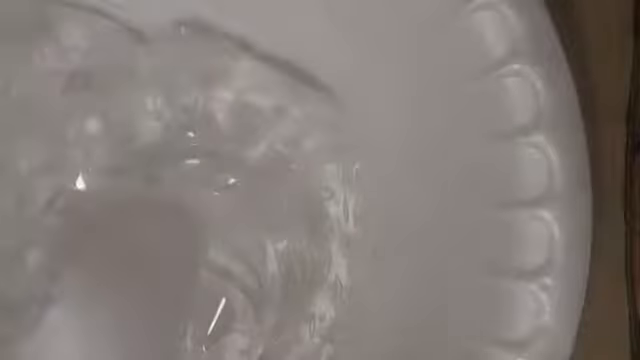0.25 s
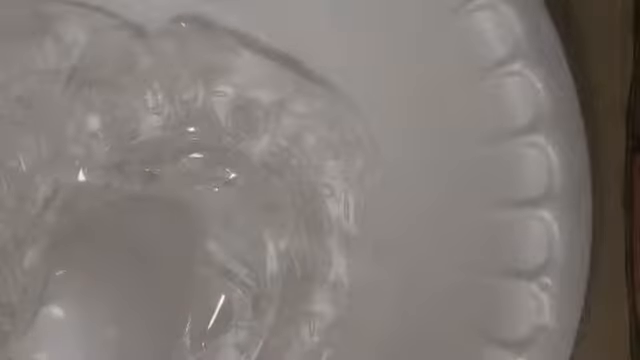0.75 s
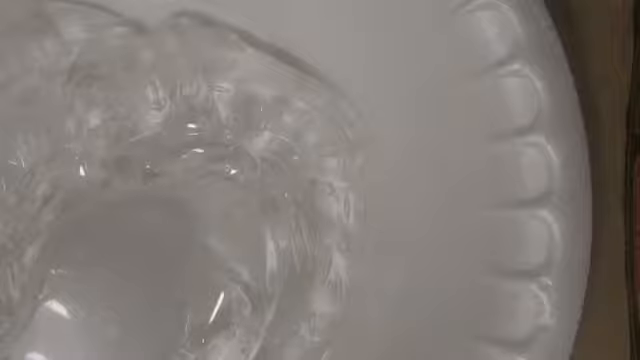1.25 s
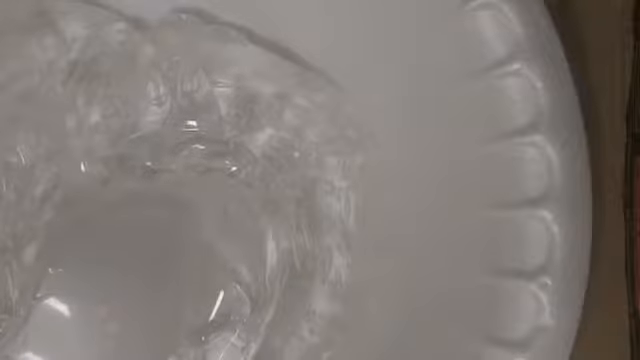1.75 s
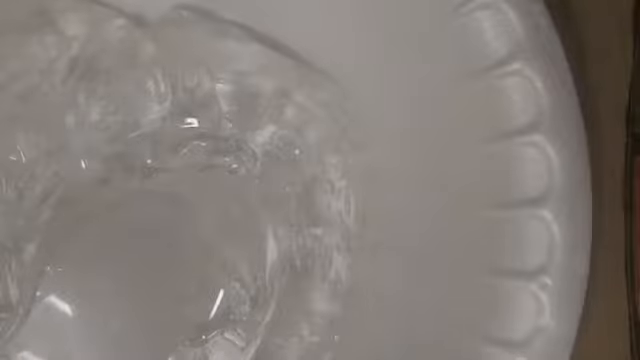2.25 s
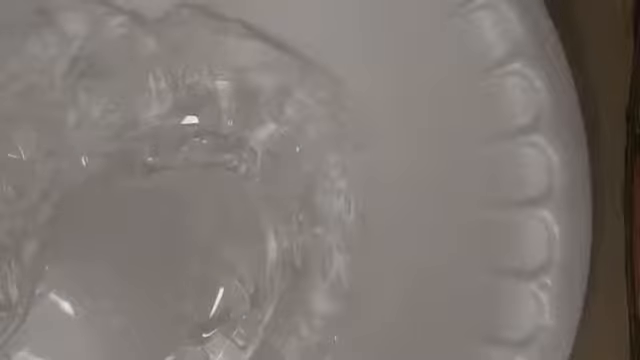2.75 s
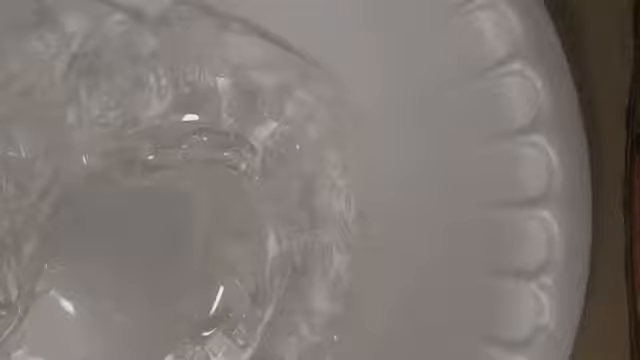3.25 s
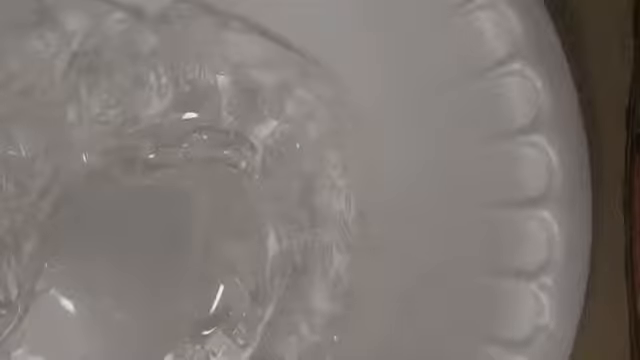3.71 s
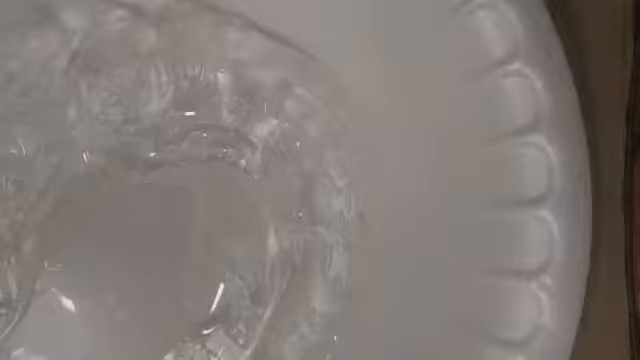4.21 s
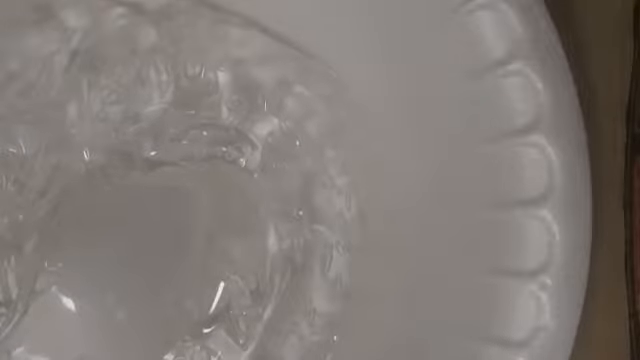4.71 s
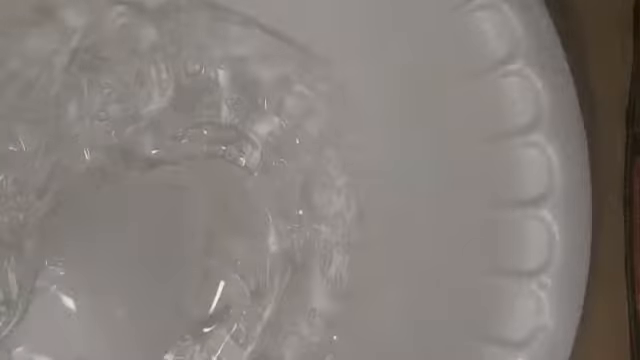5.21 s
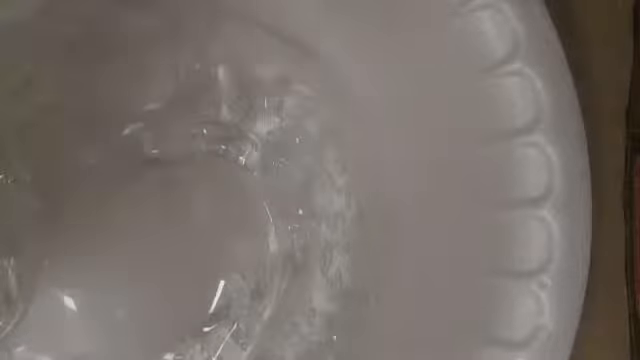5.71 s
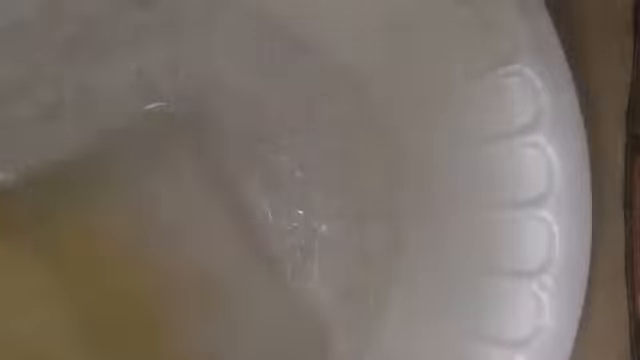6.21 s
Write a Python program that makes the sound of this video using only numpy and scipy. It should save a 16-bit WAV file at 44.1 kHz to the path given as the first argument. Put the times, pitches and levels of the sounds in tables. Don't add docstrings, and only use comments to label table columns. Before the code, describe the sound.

Close sticky crackles, soft bright rustles and light plastic taps as gloss is stirred and folded in a bowl, while an appliance drones steadily behind.

```python
import sys
import numpy as np
from scipy import signal
from scipy.fft import rfft, irfft
from scipy.io import wavfile
from scipy.ndimage import uniform_filter1d

SR = 44100
rng = np.random.default_rng(int(sys.argv[2]) if len(sys.argv) > 2 else 0)


def file_out(sig):
    cols = np.atleast_2d(sig).T
    lim = np.clip(cols, -1, 1)
    pcm = np.round(lim * 32767).astype(np.int16)
    wavfile.write(sys.argv[1], SR, pcm)


def decibels_to_gain(level_db):
    exponent = np.asarray(level_db, float) / 20
    return 10 ** exponent


N = 284886

# (frequency [Hz], density [dB per Hz])
FILM_SPECTRUM = [(2000, -12), (3200, -3), (4500, -4), (7000, 0), (10000, -1), (12500, 1), (14500, 1.5)]
# (frequency [Hz], width [Hz], level [dB])
WALL_RESONANCES = [(1536, 610, 19.5), (1940, 680, -10), (3040, 210, 2), (4620, 1500, 1)]
# (time [s], steady drag [dB], share of strokes in the wall [dB])
HAND_PRESSURE = [(0, -62.5, -6), (.4, -71.5, 3.5), (.6, -56.5, -1), (1.0, -69, -19), (1.22, -76, 1),
                 (1.35, -70, -6.5), (2.0, -69, -8), (2.15, -75, -1.5), (2.45, -68.5, -0.5),
                 (2.68, -76, -13), (3.02, -74.5, 12), (3.12, -77, 7.5), (3.6, -73.5, 1.5),
                 (3.95, -74.5, 15), (4.22, -74.5, 4), (4.7, -73, -4.5), (5.3, -75.5, -6), (6.46, -74.5, 6)]
# (peak time [s], rise [s], fall [s], rustle [dB], brightness [dB])
LONG_STROKES = [(.247, 0.17, 0.16, -55.5, 9), (.46, 0.039, 0.53, -58.5, 8.5), (.64, 0.17, 0.047, -64, -1),
                (0.707, 0.047, 0.072, -50.5, 5.5), (.873, 0.11, 0.052, -50, 2.5),
                (1.139, 0.31, 0.053, -61, 0), (1.255, 0.015, 0.27, -64.5, 4),
                (1.55, 0.31, 0.094, -61.5, 12), (1.638, 0.058, 0.075, -60, 12),
                (2.027, 0.28, 0.11, -61.5, 8.5), (2.333, 0.12, 0.027, -59.5, 3),
                (3.468, 0.16, 0.067, -63.5, 3), (4.464, 0.031, 0.11, -61, 2), (4.54, 0.094, 0.086, -63, 17),
                (4.6, 0.093, 0.043, -57.5, -2), (4.941, 0.013, 0.19, -67, 3),
                (5.372, 0.031, 0.39, -66.5, 7), (5.54, 0.28, 0.069, -69, -12), (6.2, 0.2, 0.27, -82, 4),
                (4.8, 0.11, 0.088, -76, 11)]
# (peak time [s], rise and fall [s], rustle [dB], brightness [dB])
EVEN_TUGS = [(1.194, 0.014, -58.5, -8), (1.419, 0.019, -46.5, 5.5), (1.715, 0.031, -54.5, 12.5),
             (1.87, 0.17, -66, 14), (2.263, 0.12, -56, 5), (2.83, 0.18, -66.5, 2), (3.046, 0.023, -59, 8),
             (3.169, 0.19, -68.5, 9), (3.354, 0.077, -64, 6), (3.571, 0.027, -58.5, 3),
             (3.983, 0.054, -81.5, 5), (4.24, 0.16, -68, 7), (4.37, 0.1, -61.5, -1),
             (5.144, 0.013, -59, -6)]
# (start [s], end [s], frequency [Hz], width [Hz])
AIR_POCKETS = [
    (.445, .515, 10650, 1600),
    (.415, .47, 11400, 350),
    (.47, .525, 7800, 600),
    (.567, .655, 4050, 350),
    (4.515, 4.565, 11100, 500),
]
# (time [s], peak [dB], centre [Hz])
FILM_SNAPS = [(0.0493, -45, 13000), (0.1206, -39, 12200), (0.1408, -34, 11700), (0.1954, -45, 13100),
              (0.4381, -45, 13400), (0.4586, -44, 12900), (0.4684, -39, 12600), (0.4805, -44, 12700),
              (0.5219, -42, 9300), (0.6387, -44, 8650), (0.6473, -42, 11400), (0.6756, -39, 6160),
              (0.6864, -30, 7000), (0.7704, -52, 10600), (0.7937, -52, 8400), (0.858, -33, 5200),
              (0.8717, -33.5, 8400), (0.9332, -43.5, 8400), (1.0959, -51, 5400), (1.1878, -42, 5960),
              (1.1973, -44, 5600), (1.2488, -47, 5500), (1.2575, -43, 5900), (1.2958, -47, 12500),
              (1.3482, -37, 10400), (1.4112, -37, 12600), (1.419, -38, 11900), (1.4229, -46, 13100),
              (1.4259, -35, 12300), (1.4598, -46, 12700), (1.4665, -47, 12700), (1.4859, -45, 12700),
              (1.5708, -43, 13100), (1.61, -57, 11400), (1.6512, -44, 11200), (1.6624, -43, 12400),
              (1.6749, -43, 12600), (1.7076, -37, 12500), (1.7186, -36, 12200), (1.7234, -46, 12300),
              (1.7707, -41, 13300), (1.7785, -42, 10200), (1.7868, -50, 12800), (1.8088, -53, 12900),
              (1.8117, -49, 13000), (1.8454, -56, 12300), (1.8685, -51, 7900), (1.8759, -44, 12600),
              (1.9396, -43, 13100), (1.959, -55, 13000), (1.9784, -54, 11600), (2.0294, -36.5, 11500),
              (2.0361, -42, 11300), (2.168, -50, 13200), (2.1823, -37, 7800), (2.1896, -54, 5600),
              (2.2159, -33, 8900), (2.2487, -34, 9330),
              (2.265, -38, 9000), (2.274, -36, 11000), (2.2828, -32.5, 10600), (2.323, -40, 10500),
                 (2.3289, -42, 6700), (2.332, -39, 8800), (2.3443, -45, 13000), (2.3951, -52, 8600),
                 (2.4007, -45, 6400), (2.4348, -50, 9300), (2.5, -40.5, 8850), (2.509, -40, 7100),
                 (2.6084, -53, 8100), (2.77, -46, 6700), (2.79, -40, 5300), (2.8176, -38.5, 8700),
                 (2.8479, -47, 9200), (2.892, -52, 3500), (2.8956, -52, 3510), (2.9152, -40, 7360),
                 (2.981, -46, 10900), (3.0351, -28.5, 6800), (3.0389, -34, 10800), (3.0483, -40, 7600),
                 (3.0795, -33, 9500), (3.094, -38, 11300), (3.0986, -49, 12200), (3.1184, -44, 9000),
                 (3.127, -41, 12400), (3.1563, -40, 8600), (3.1595, -39, 10400), (3.1664, -34, 10700),
                 (3.1794, -31.5, 9400), (3.2069, -40, 12600), (3.2298, -47, 10400), (3.2434, -38.5, 12800),
                 (3.2649, -52, 8500), (3.3065, -54, 12900), (3.311, -41, 11500), (3.319, -45, 10000),
                 (3.3335, -33.5, 8600), (3.3489, -41, 9400), (3.356, -33, 11700), (3.3615, -40, 11200),
                 (3.3658, -43, 8600), (3.379, -50, 12400), (3.46, -35, 8300), (3.4745, -50, 7400),
                 (3.4915, -50, 8200), (3.52, -47, 13000), (3.5245, -52, 9100), (3.5525, -52, 10500),
                 (3.559, -40, 8400), (3.5637, -40, 11800), (3.569, -40, 12100), (3.5778, -41, 11200),
                 (3.6, -42.5, 8700), (3.66, -44.5, 8600),
              (3.9768, -43, 8200), (3.9875, -45, 8500), (4.0298, -59, 4200), (4.1045, -49, 8700),
                 (4.125, -54, 3500), (4.15, -53, 3700), (4.1694, -51, 8400), (4.176, -48, 3800),
                 (4.1807, -41, 8700), (4.185, -40, 8300), (4.1985, -45, 9600), (4.2014, -46, 9600),
                 (4.2318, -39, 8700), (4.2409, -30.5, 12900), (4.2449, -46, 10200), (4.2491, -43, 7300),
                 (4.2721, -42, 9400), (4.2774, -39, 8500), (4.2977, -36, 12500), (4.3059, -41, 3800),
                 (4.3233, -41, 13000), (4.3298, -42, 8700), (4.3407, -36, 10400), (4.3494, -36.5, 9300),
                 (4.3655, -38, 6500), (4.3704, -41, 4600), (4.3742, -46, 5000), (4.3777, -41, 5800),
                 (4.3966, -40, 12700), (4.4296, -43, 7800), (4.4388, -48, 10400), (4.4432, -35, 9000),
                 (4.4566, -42, 12500), (4.4693, -40, 8700), (4.4878, -40, 6900), (4.5107, -40, 6900),
                 (4.5197, -40, 13000), (4.5455, -48, 12800), (4.5732, -39, 8600), (4.5894, -40, 7100),
                 (4.5932, -44, 3900), (4.6054, -44, 12000), (4.6424, -44, 7800), (4.6454, -47, 5600),
                 (4.6554, -41, 4000), (4.9317, -44, 7400), (4.935, -43.5, 12100), (5.052, -49, 7300),
                 (5.1385, -27, 11400), (5.143, -50, 12500), (5.147, -53, 10200), (5.1503, -44, 12900),
                 (5.1717, -43, 7700), (5.1987, -40.5, 4000), (5.3553, -48, 7900), (6.1114, -56, 4300),
                 (6.3476, -56, 5200), (6.418, -49, 13200)]
# (peak time [s], peak [dB], pitch [Hz], rise [s])
WET_POPS = [(.1445, -43, 1340, .003), (.1445, -43, 680, 0.0021), (.157, -46.5, 724, .003),
            (.4386, -44, 1490, 0.00086), (0.8568, -47, 4940, 0.00087), (0.8715, -52, 2370, 0.0011),
            (.555, -51, 1720, .003), (.5609, -51, 970, .003), (.571, -48, 895, 0.0034),
            (1.0962, -43, 1900, 0.0012), (1.0963, -45.5, 2580, .001), (1.126, -43, 2300, 0.00046),
            (1.1319, -45, 2610, .0018), (1.1377, -45, 2250, 0.00084), (1.1432, -40, 2300, 0.00065),
            (1.1486, -42, 2260, 0.00077), (1.152, -42, 1900, .0008), (1.161, -51, 2200, .003),
            (1.1876, -26.5, 2030, 0.00088), (1.1942, -36, 2210, 0.00084), (1.2005, -37, 1910, .0025),
            (1.205, -44, 1850, 0.00148), (1.2116, -53, 1930, .002), (1.1938, -44, 1340, 0.00137),
            (1.414, -47.5, 1080, 0.0016), (1.4185, -34.5, 1660, 0.00082), (1.4265, -53, 1510, .0012),
            (2.2483, -46.5, 2420, 0.00077), (2.3242, -56, 2030, 0.00064), (3.0345, -28, 735, .0015),
            (3.038, -32, 1020, 0.00214), (3.043, -37, 970, 0.0017), (3.044, -33, 520, .003),
            (3.0482, -30, 850, 0.0011), (3.0505, -31, 620, 0.00079), (3.035, -43, 2520, .001),
            (3.0566, -41, 860, 0.0014), (3.0692, -42, 825, 0.0016), (3.0779, -45, 830, 0.0019),
            (3.0868, -49, 1550, 0.0016), (3.9853, -53, 1610, .001), (4.2416, -56, 1900, .0008),
            (4.2779, -46.5, 1750, .0008), (4.298, -47, 3000, 0.00051), (4.4301, -53, 1700, 0.00081),
            (4.5154, -48, 1050, 0.0014), (4.595, -46, 1040, 0.0018)]
# (peak time [s], peak [dB], pitch [Hz], rise [s])
TABLE_THUMPS = [
    (0.1452, -37.5, 300, 0.0026),
    (0.154, -32.5, 284, 0.0037),
    (1.419, -40.5, 333, 0.0032),
    (1.425, -37.5, 282, 0.0032),
    (3.039, -39.5, 385, 0.0038),
]
# (time [s], peak [dB], pitch [Hz], share of the other modes [dB], crack [dB])
BOWL_KNOCKS = [(.1425, -36.5, 670, 12, 0.5), (.55, -38, 883, -8, -10), (1.0955, -39, 670, -8, -6),
               (1.4175, -35.5, 1550, 23, 0), (2.181, -43, 654, -7, -5), (2.2145, -42, 1330, 3, 1),
               (3.0335, -32.5, 1420, -4, -4), (3.156, -47.5, 1760, -23, -8), (4.365, -42.5, 1630, -21, -17),
               (4.514, -37, 920, -9, -10), (4.5885, -35, 650, -2, -0.5), (4.592, -51, 1030, -2, -14),
               (5.138, -56, 1940, -28, 14), (5.171, -54, 1930, -22, 7), (5.199, -60, 2210, 2, -4)]
# (frequency [Hz], level [dB], t60 [s])
BOWL_MODES = [(520, -26, 0.098), (520, -2.5, 0.23), (641, 7, 0.045), (741, -1, 0.11), (860, -5.5, 0.11),
              (1012, 10, 0.023), (1160, -16, 0.025), (1340, 14, 0.015), (1580, -12, 0.1), (1770, 0.5, 0.02),
              (2200, -66, .04), (2580, -31, 0.027)]
# (start [s], length [s], first pitch [Hz], width [Hz], level [dB])
GRITTY_SLIPS = [(.438, 0.071, 1600, 130, -54), (.452, 0.047, 1250, 130, -55.5),
                (0.44, 0.049, 1600, 260, -62), (.436, 0.047, 3150, 690, -57.5),
                (.83, 0.071, 5830, 340, -60), (.452, 0.065, 7000, 520, -64), (.452, 0.04, 4950, 250, -59),
                (0.55, .05, 4900, 260, -65), (.445, .05, 2700, 230, -62), (0.442, 0.067, 12800, 640, -50),
                (1.1, 0.073, 2300, 900, -60), (0.21, 0.15, 1500, 340, -66), (.687, 0.065, 3960, 280, -57)]
# (frequency [Hz], density [dB per Hz])
ROOM_AIR = [(76, -74), (130, -38.5), (208, -16.5), (290, -9.5), (346, -9.5), (413, -2.5), (483, -8.5),
            (532, -12.5), (939, -23), (1830, -39), (2500, -36), (3040, -33), (6150, -50.5), (14000, -46)]
# (frequency [Hz], width [Hz], level [dB])
DUCT_DRONES = [(400.4, 46, -58), (430.1, 46, -59.5), (1029.5, 23, -77), (640.5, 70, -72.5)]
# (frequency [Hz], wander [Hz], level [dB])
MOTOR_LINES = [(360, 0.21, -57), (770, 3, -82), (873, 10, -83), (1168, 2, -77), (1260, 2, -82),
               (2270, 8.9, -93), (3105, 4, -83), (3622, 2.5, -83), (4140, 2.5, -87)]


def evened(x):
    return x / np.sqrt(np.mean(x ** 2) + 1e-20)


def add(mix, s, sound):
    part = mix[round(s * SR):][:len(sound)]
    part += sound[:len(part)]


def coloured(x, points):
    f, db = np.transpose(points)
    hz = np.fft.rfftfreq(len(x), 1 / SR)
    gain = decibels_to_gain(np.interp(np.log(hz + 1), np.log(f + 1), db))
    return evened(irfft(rfft(x) * gain, len(x)))


def resonate(x, hz, width):
    r = np.exp(-np.pi * width / SR)
    return signal.lfilter([1 - r, 0, r - 1], [1, -2 * r * np.cos(2 * np.pi * hz / SR), r * r], x)


def ring(hz, t60, t):
    return decibels_to_gain(-60 * t / t60) * np.sin(2 * np.pi * hz * t)


def rubbing():
    tears_per_s, spread_db, clump_db = 3000, 2.4, 1.5
    t = np.arange(N) / SR
    slow_t = t[::32]
    level, bright_level, wall_level = [np.interp(t, slow_t, gain) for gain in rub_levels(slow_t)]
    tears = decibels_to_gain(spread_db * np.minimum(rng.exponential(1, N), 5)) * (rng.random(N) < tears_per_s / SR)
    tears = evened(tears * rng.choice([-1., 1.], N))
    tears = tears + rng.standard_normal(N)
    clumps = evened(uniform_filter1d(rng.standard_normal(N), 220))
    tears = evened(tears * decibels_to_gain(clump_db * clumps))
    wall = evened(sum(decibels_to_gain(db) * resonate(tears, hz, width) for hz, width, db in WALL_RESONANCES))
    film = coloured(tears, FILM_SPECTRUM)
    dull = signal.sosfiltfilt(signal.butter(3, 9500, fs=SR, output="sos"), film)
    return level * evened(dull) + bright_level * evened(film - dull) + wall_level * wall


def rub_levels(t):
    bright_drag_db, wall_rest_db, rest_db = 4, -68.5, -75
    span_db = 17.5
    s, drag_db, wall_db = np.transpose(HAND_PRESSURE)
    drag = np.maximum(decibels_to_gain(np.interp(t, s, drag_db)) ** 2 - decibels_to_gain(rest_db) ** 2, 0)
    dull, bright = np.zeros(len(t)), np.zeros(len(t))
    tugs = [(peak, length, length, db, bright_db) for peak, length, db, bright_db in EVEN_TUGS]
    for peak, rise, fall, db, bright_db in LONG_STROKES + tugs:
        away = np.maximum((peak - t) / rise, (t - peak) / fall)
        power = decibels_to_gain(db - span_db * away) ** 2
        dull += power
        bright += power * decibels_to_gain(bright_db) ** 2
    wall = decibels_to_gain(wall_rest_db) ** 2 + dull * decibels_to_gain(np.interp(t, s, wall_db)) ** 2
    return np.sqrt([drag + dull, drag * decibels_to_gain(bright_drag_db) ** 2 + bright, wall])


def swallowed(x):
    t = np.arange(N) / SR
    for start, end, hz, width in AIR_POCKETS:
        depth = np.clip(np.minimum(t - start, end - t) / 0.0085, 0, 1)
        for stage in range(3):
            x = x - depth * resonate(x, hz, width)
    return x


def snaps():
    out, t = np.zeros(N), np.arange(2000) / SR
    envelope = (decibels_to_gain(-60 * t / 0.006) + decibels_to_gain(-19 - 60 * t / 0.03)) * (1 - np.exp(-t / 0.0003))
    for s, db, hz in FILM_SNAPS:
        wall_db = -19.5 - 3.5 * np.log2(hz / 8000)
        fizz = rng.standard_normal(len(t)) * envelope
        tick = resonate(fizz, hz, 0.37 * hz) + 0.4 * signal.lfilter([1, -1], [1, -.55], fizz)
        wall = resonate(resonate(fizz, 2100, 4800), 2100, 4800)
        snap = tick / abs(tick).max() + decibels_to_gain(wall_db) * wall / abs(wall).max()
        add(out, s - .0006, decibels_to_gain(db - 1) * snap)
    return out


def pops_and_thumps():
    out = np.zeros(N)
    for s, db, hz, rise in WET_POPS + TABLE_THUMPS:
        t = np.arange(0, 9 * rise, 1 / SR)
        swell = t / rise * np.exp(1 - t / rise)
        sagging = np.sin(2 * np.pi * hz * t * (1 - .004 * t / rise))
        add(out, s - rise, decibels_to_gain(db) * swell * sagging)
    return out


def knocks():
    out, t = np.zeros(N), np.arange(6000) / SR
    blow_t = t[:800]
    body = sum(decibels_to_gain(db) * ring(hz, t60, t) for hz, db, t60 in BOWL_MODES)
    swell = 1 - np.exp(-t / 0.00051)
    for s, db, hz, body_db, crack_db in BOWL_KNOCKS:
        t60 = 0.039 * min(hz / 900, 900 / hz) ** 0.61
        chatter = .04 * rng.standard_normal(len(blow_t)) * decibels_to_gain(-60 * blow_t / .015)
        blow = (blow_t == 0) + chatter
        blow = np.convolve(blow, np.hanning(9))
        spot = ring(hz, t60, t)
        spot += .6 * ring(1.1 * hz, .8 * t60, t) + .6 * ring(.91 * hz, .8 * t60, t)
        knock = signal.fftconvolve(blow, swell * (spot + decibels_to_gain(body_db) * body))
        crack = resonate(resonate(blow, 1700, 1600), 1800, 1200)
        add(out, s - .0005, decibels_to_gain(db) * knock / abs(knock).max())
        add(out, s - .0005, decibels_to_gain(db + crack_db) * crack / abs(crack).max())
    return signal.sosfilt(signal.butter(3, 340, "high", fs=SR, output="sos"), out)


def slips():
    out = np.zeros(N)
    for s, length, first_hz, width, db in GRITTY_SLIPS:
        grit = rng.standard_normal((2, round(length * SR)))
        grit = grit * abs(grit)
        glide_hz = np.linspace(first_hz, 0.96 * first_hz, grit.shape[1])
        turn = np.exp(2j * np.pi * np.cumsum(glide_hz) / SR)
        low_pass = signal.butter(2, width / 2, fs=SR, output="sos")
        flutter = signal.sosfilt(low_pass, grit[0] + 1j * grit[1])
        add(out, s, decibels_to_gain(db) * evened((flutter * turn).real) * signal.windows.tukey(len(turn), .4))
    return out


def room(x):
    t60 = 0.075
    t = np.arange(SR // 2) / SR
    tail = rng.standard_normal(len(t)) * decibels_to_gain(-60 * t / t60) * (t > .002)
    return signal.fftconvolve(x, tail / np.linalg.norm(tail))[:N]


def room_tone():
    out = decibels_to_gain(-53.5) * coloured(rng.standard_normal(N), ROOM_AIR)
    for hz, width, db in DUCT_DRONES:
        out += decibels_to_gain(db) * evened(resonate(resonate(rng.standard_normal(N), hz, width), hz, width))
    for hz, width, db in MOTOR_LINES:
        wander = evened(uniform_filter1d(rng.standard_normal(N), 4000))
        turns = np.cumsum(hz + width * wander) / SR
        out += decibels_to_gain(db) * np.sqrt(2) * np.sin(2 * np.pi * turns)
    return out


def scene():
    wet = pops_and_thumps()
    hits = snaps() + knocks() + slips() + decibels_to_gain(-3.5) * wet
    bowl = rubbing() + hits + decibels_to_gain(-5.5) * room(hits) + 0.18 * wet
    return (swallowed(bowl) + room_tone())[None]


def top_cut(x):
    return signal.sosfilt(signal.butter(12, 15120, fs=SR, output="sos"), x)


def record(dry):
    thin = signal.sosfilt(signal.butter(3, 140, "high", fs=SR, output="sos"), dry)
    self_noise = coloured(rng.standard_normal(N), [(20, -10.5), (100, -6), (300, -20.5)])
    thin = thin + decibels_to_gain(-80.5) * self_noise
    band_limit = signal.firwin(601, 13930, window=("kaiser", 7), fs=SR)
    limited = signal.oaconvolve(thin, band_limit[None], "same")
    return top_cut(limited)


dry = scene()
out = record(dry)
file_out(out)
```